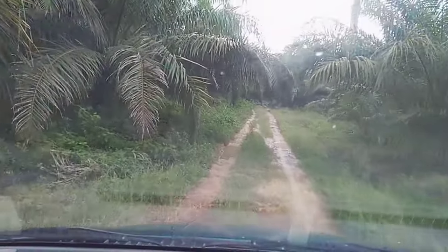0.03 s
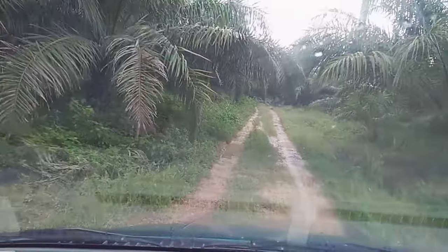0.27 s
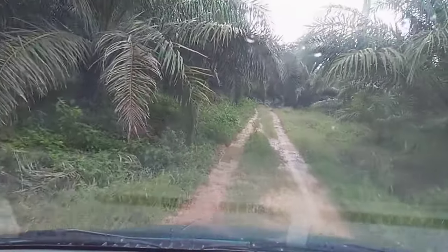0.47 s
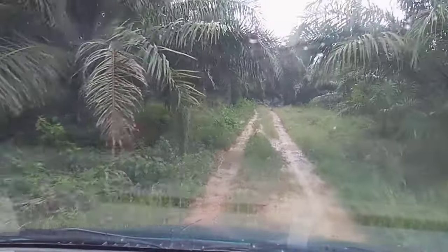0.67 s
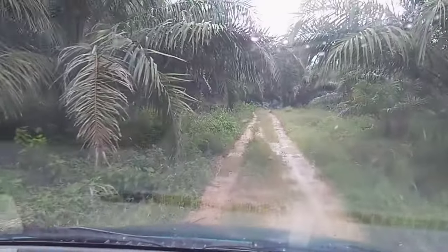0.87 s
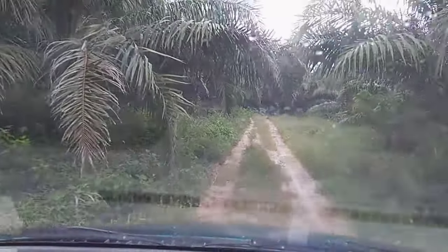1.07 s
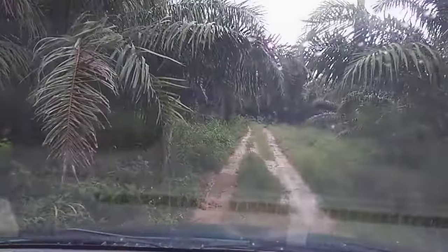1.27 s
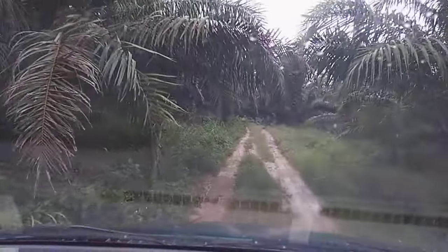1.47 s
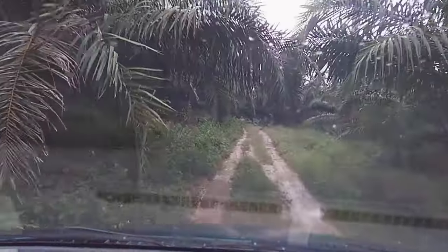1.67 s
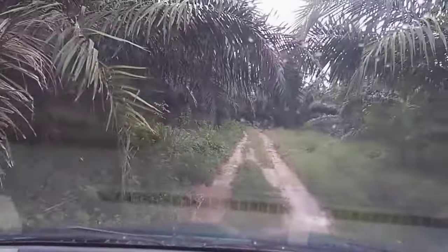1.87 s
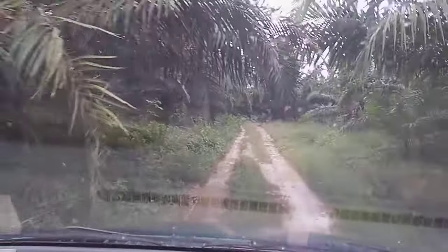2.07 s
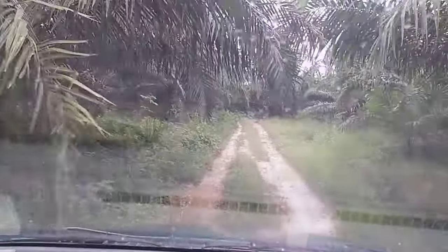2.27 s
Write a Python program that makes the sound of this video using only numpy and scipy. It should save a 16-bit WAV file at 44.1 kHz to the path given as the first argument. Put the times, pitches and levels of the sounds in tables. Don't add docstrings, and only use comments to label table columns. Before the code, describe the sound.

Deep rumble and heavy thumps inside a slow car on a bumpy track, with knocks and key ticks

```python
import sys
import numpy as np
from scipy import signal
from scipy.io import wavfile

SR = 44100
rng = np.random.default_rng(int(sys.argv[2]) if len(sys.argv) > 2 else 0)


def bounce(signal):
    frames = np.transpose(np.atleast_2d(signal))
    limited = np.clip(frames, -1, 1)
    pcm = np.round(limited * 32767).astype(np.int16)
    wavfile.write(sys.argv[1], SR, pcm)


def to_linear_factor(level_db):
    exponent = np.asarray(level_db, float) / 20
    return 10 ** exponent


N = 102267

SHELL_DB = -50
PORT_HZ, PORT_WIDTH_HZ = 10580, 4300


def rms_one(x):
    return x / np.sqrt(np.mean(x ** 2) + 1e-20)


def pan(x, db):
    left = to_linear_factor(db)
    sides = np.array([left / (1 + left) + 0 * x, 1 / (1 + left) + 0 * x])
    return 2 * x * sides


def drift(rate):
    r = np.exp(-80 * np.pi * rate / SR)
    white = rng.standard_normal(N // 40 + 2002)
    slow = signal.lfilter([1], [1, -2 * r, r * r], white)[2000:]
    return np.interp(np.arange(N) / 40, np.arange(len(slow)), rms_one(slow))


def resonate(x, hz, width_hz):
    r = np.exp(-np.pi * width_hz / SR)
    gain = (1 - r * r) / 2
    return signal.lfilter([gain, 0, -gain], [1, -2 * r * np.cos(2 * np.pi * hz / SR), r * r], x)


def resonate_twice(x, hz, width_hz):
    return resonate(resonate(x, hz, width_hz), hz, 2 * width_hz)


def band(x, low_hz, high_hz):
    sos = signal.butter(2, [low_hz, min(high_hz, SR * .45)], "band", fs=SR, output="sos")
    return signal.sosfilt(sos, x)


def coloured(spectrum, alike, patchy_db):
    hz, db = np.transpose(spectrum)
    edges = np.geomspace(hz[0], hz[-1], num=14)
    white, out = rng.standard_normal((2, 2, N)), 0
    for k, (low, high) in enumerate(zip(edges, edges[1:])):
        mid, side = band(white[k % 2], low, high)
        level_db = np.interp(np.log(low * high) / 2, np.log(hz), db)
        gain = to_linear_factor(level_db + patchy_db * drift(20.0))
        out = out + gain * (np.sqrt(1 + alike) * mid + np.sqrt(1 - alike) * side * [[1], [-1]])
    return rms_one(out)


# centre in Hz, width in Hz, level in dB.
RIDGES = [(5610, 620, -95), (7130, 840, -91)]


def ridges():
    white, out = rng.standard_normal((2, N)), 0
    for hz, width, db in RIDGES:
        ridge = rms_one(resonate(resonate(white, hz, width), hz, width))
        out = out + to_linear_factor(db + 4.0 * drift(12.0)) * ridge
    return out


# pitch in Hz, level in dB per Hz.
HISS_COLOUR = [(2940, -6), (5000, -14.5), (6400, -8), (8210, -12.5), (9640, -2.5), (10700, 10),
               (12500, -25.5), (13300, -27), (15400, -28)]


def hiss():
    steady = to_linear_factor(-79) * coloured(HISS_COLOUR, 0, patchy_db=1.9)
    return (steady + ridges()) * to_linear_factor([[1.5], [-1.5]])


# pitch in Hz, level in dB per Hz.
ROAD_COLOUR = [(150, -34), (250, -4), (383, -7.5), (451, -14), (594, -13), (753, -15), (1200, -19),
               (5000, -44.5), (6500, -84.5), (11000, -120)]


def road(shaking):
    follow = (shaking / to_linear_factor(SHELL_DB)) ** 0.35
    noise = coloured(ROAD_COLOUR, 0.19, patchy_db=2.2)
    return to_linear_factor(-69.5) * follow * noise * to_linear_factor([[3], [-3]])


# start in seconds, length in seconds, level in dB, top in Hz, bright share in dB.
SCUFFS = [(-0.005, 0.0061, -62, 3300, 5), (.04, 0.015, -73, 3340, -2), (0.168, 0.041, -75, 3850, -3),
          (0.214, 0.039, -71.5, 2870, -24), (0.311, 0.035, -69.5, 3500, -26),
          (0.542, 0.05, -74, 2800, -2.5), (0.577, 0.086, -64.5, 1860, -17),
          (0.614, 0.046, -73.5, 6460, -19), (0.784, 0.024, -66.5, 3320, -13),
          (0.66, 0.09, -69.5, 2070, -5.5), (1.041, 0.018, -66.5, 4200, -7),
          (1.076, 0.0084, -69, 2600, -6.5), (1.123, 0.099, -78, 4630, -1.5), (1.255, 0.015, -75.5, 2790, 0),
          (1.388, 0.015, -78.5, 4000, -7), (1.742, 0.053, -72, 1600, -19), (1.337, 0.028, -72.5, 2740, -15),
          (1.508, 0.021, -85, 4060, -15), (1.823, 0.017, -70.5, 1850, -32), (1.853, 0.074, -62, 1390, -20),
          (1.9, 0.015, -61, 4330, -12.5), (1.935, 0.078, -70, 4050, -3.5), (2.03, 0.014, -60.5, 2960, -9),
          (2.056, 0.06, -76, 3400, -14), (2.207, 0.066, -78.5, 2470, -1.5)]


def scuffs(t):
    attack_share, release_s, grains_per_s = .4, 0.016, 4500
    hits = rng.random((2, N)) < grains_per_s / SR
    strength = rng.standard_normal((2, N)) * to_linear_factor(2 * np.minimum(rng.exponential(1, (2, N)), 2))
    grains = hits * strength
    bright = rms_one(resonate_twice(grains, PORT_HZ, PORT_WIDTH_HZ))
    thud = to_linear_factor(2.5) * rms_one(band(grains.sum(axis=0), 140, 422))
    crisp = sum(resonate(resonate(grains, hz, 2 * width), hz, 2 * width) for hz, width, db in RIDGES)
    bright = bright + to_linear_factor(-9.5) * rms_one(crisp)
    out = np.zeros((2, N))
    for s, length, db, top_hz, bright_db in SCUFFS:
        attack = np.clip((t - s) / (attack_share * length), 0, 1) ** 2
        release = np.exp(-np.maximum(t - s - length, 0) / release_s)
        dull = band(band(grains, .38 * top_hz, top_hz), 200, 0.98 * top_hz)
        out += to_linear_factor(db) * attack * release * (rms_one(dull) + thud + to_linear_factor(bright_db) * bright)
    return out * to_linear_factor([[2.75], [-2.75]])


KEY_HZ = [11700, 10330, 10730, 10530]
# start in seconds, peak in dB, time to fade by 60 dB in seconds, left over right in dB.
TICKS = [
    (-0.002, -40, 0.23, 17),
    (0.8017, -35, 0.067, 43),
    (0.83, -52.5, 0.1, 18),
    (.428, -59.5, .04, 3),
    (1.231, -58, 0.042, 11),
    (1.396, -57, 0.038, 8.5),
    (1.541, -54.5, 0.03, 12),
]


def ticks(t):
    rise_s, snap_db, snap_s = .0012, 7, .0025
    white = rng.standard_normal(N)
    broad = resonate(resonate(white, PORT_HZ, 3000), PORT_HZ, 5000)
    jingle = rms_one(broad + sum(3.4 * resonate(white, hz, 170) for hz in KEY_HZ))
    out = 0
    for s, db, t60, pan_db in TICKS:
        age = np.maximum(t - s, 0)
        fade_db = -60 * age / t60 + snap_db * np.exp(-age / snap_s)
        shape = np.clip(age / rise_s, 0, 1) * to_linear_factor(db - 16.5 + fade_db)
        out = out + pan(shape * jingle, pan_db)
    return out


def contact(t, peak_s):
    u = np.maximum(t, 0) / peak_s
    return (u * np.exp(1 - u)) ** 2.5


def struck(t, hz, peak_s):
    return np.sin(2 * np.pi * hz * t) * contact(t, peak_s)


# pitch in Hz, level in dB, time to peak in seconds.
CLACK = [(640, 4.5, 0.0054), (1200, 7.5, 0.0021), (1670, -0.5, 0.0051), (1894, -5.5, 0.0058),
         (2214, -13.5, 0.006), (3200, -11, 0.0042), (3650, -10, 0.0044), (4400, -24, 0.0027),
         (5300, -39, 0.0022)]


def clack(t):
    start_s, level_db = 1.0472, -40.5
    modes = sum(to_linear_factor(level_db - 5.5 + db) * struck(t - start_s, hz, peak_s) for hz, db, peak_s in CLACK)
    return pan(modes, 8.5)


# start in seconds, peak in dB, pitch in Hz, time to peak in seconds, left over right in dB.
KNOCKS = [(0.054, -60.5, 1430, 0.00087, -22), (0.249, -57.5, 950, 0.0018, 10),
          (.313, -51, 932, 0.0083, 13.5), (.3285, -51, 930, 0.001, 15), (0.3329, -51, 938, 0.0024, 11),
          (0.3383, -48, 950, 0.0033, 17.5), (0.352, -45.5, 913, 0.0031, 13.5),
          (0.428, -64, 3460, 0.00059, 16), (0.7886, -43, 1400, 0.0028, 21), (0.603, -50.5, 1110, .003, 0.1),
          (0.6133, -54, 1540, 0.0066, 5), (.624, -51, 1143, 0.0031, 2), (0.6407, -54.5, 1704, 0.0034, 14),
          (0.795, -50, 1450, 0.0017, -4), (.8008, -61.5, 6930, .0015, 22),
          (0.802, -51.5, 1430, 0.0011, -14), (0.812, -55, 1530, 0.0021, 7), (1.192, -58, 1130, 0.0048, 7.5),
          (1.198, -69, 1562, 0.011, 17), (1.496, -67, 900, 0.00087, 4), (1.51, -61, 950, 0.0017, 13),
          (1.525, -53, 1435, 0.0027, 11.5), (1.531, -61.5, 1610, .002, 11), (1.54, -62, 1690, 0.0013, 4),
          (1.757, -61.5, 1160, 0.0026, 21), (1.9628, -63, 1120, .004, 12), (1.544, -62, 1545, 0.005, 7),
          (1.757, -58.5, 640, 0.0076, 6), (1.886, -56.5, 1166, 0.0056, 18),
          (1.899, -55.5, 2800, 0.0013, 10), (2.0872, -44.5, 1073, 0.0013, -32),
          (2.103, -55, 1066, 0.0019, -8), (2.273, -56, 1235, 0.0024, 10)]
# start in seconds, peak in dB, pitch in Hz, time to peak in seconds.
CREAKS = [(0.317, -65, 2720, .005), (.331, -64.5, 2296, 0.0028), (0.352, -63, 2725, 0.0062),
          (0.7995, -63.5, 3100, 0.0025), (1.171, -66, 3640, .0011), (1.1715, -69, 5400, 0.00092),
          (1.203, -70.5, 1910, 0.012), (1.231, -70, 3300, .001), (1.526, -76, 2970, 0.0027),
          (1.5406, -65, 3310, 0.0011), (1.963, -68, 3190, .005)]


def knocks(t):
    buzz = 0.059
    creak_pan_db = 13.5
    grit = rms_one(resonate_twice(rng.standard_normal(N), 2780, 450))
    out = np.zeros((2, N))
    for s, db, hz, peak_s, pan_db in [*KNOCKS, *[(*row, creak_pan_db) for row in CREAKS]]:
        i = slice(int(s * SR), int(s * SR) + SR // 8)
        age = t[i] - s
        upper = to_linear_factor(-27) * grit[i] * contact(age, peak_s)
        knock = struck(age, hz, peak_s) * (1 + buzz * grit[i])
        out[:, i] += pan(to_linear_factor(db) * (knock + upper), pan_db)
    return out


def cabin(x):
    t60_s, level_db = .08, -14
    t = np.arange(SR // 6) / SR
    tail = rng.standard_normal((2, len(t))) * to_linear_factor(-60 * t / t60_s) * (t > .002)
    tail = signal.lfilter([.5], [1, -.5], tail)
    tail = tail / np.sqrt(np.sum(tail ** 2, axis=1, keepdims=True))
    return to_linear_factor(level_db) * signal.fftconvolve(x, tail, axes=1)[:, :N]


# time in seconds, shell level in dB, deep hum level in dB.
TRACK = [(0, 0.5, -1), (.12, -5, 2), (.3, 0.2, 2), (.48, -9.5, -3), (.68, 5.5, -2), (.95, -4, -1.5),
         (1.16, 0.5, 1), (1.3, 1, -9), (1.55, 1.7, 3), (1.75, -0.5, -3), (1.95, 3, -4.5), (2.32, -5.5, 1.5)]


def track():
    s, *columns = np.transpose(TRACK)
    return [np.interp(np.arange(N) / SR, s, c) for c in columns]


def shake():
    lead_s, wider = 0.015, 1.27
    t, shudder = np.arange(N) / SR, 0
    for s, db, hz, width in [*HEAVES, *PUSHES]:
        bump = np.exp(-((t - s + lead_s) / (wider * width)) ** 2)
        shudder = shudder + (to_linear_factor(db * 0.87 - 19) * bump) ** 2
    return np.sqrt(to_linear_factor(2 * (SHELL_DB + track()[0])) + shudder)


# pitch in Hz, width in Hz, level in dB.
SHELL = [(27, 14.7, 3.5), (59.5, 14.9, -9.5), (82.6, 29.6, -27), (121.5, 20.5, -15), (179.5, 20.8, -26.5),
         (226.3, 18, -30), (259, 43, -34), (377, 60, -33.5), (598, 86, -45)]


def shell(shaking, lean_db):
    warm_up = SR // 2
    white = rng.standard_normal((2, 2, N + warm_up))
    drive = white[0] * np.concatenate([np.full(warm_up, shaking[0]), shaking])

    def mode(x, hz, width, db):
        ringing = resonate_twice(x, hz, width)[:, warm_up:]
        return ringing * np.sqrt(SR / 2 / width) * to_linear_factor(db + 2 * drift(3.32))

    hum = to_linear_factor(-43.5 + track()[1]) * mode(white[1], *SHELL[0])
    upper = sum(mode(drive, *row) * (-1) ** k for k, row in enumerate(SHELL[1:]))
    both = hum + to_linear_factor(7) * upper
    return pan(both[0], lean_db) + to_linear_factor(-16.0) * both[1] * [[1], [-1]]


# time in seconds, left over right in dB.
LEAN = [(0, 0), (0.359, 7.5), (1.1, 7.5), (2.32, 11)]


def lean(t):
    s, lean_db = np.transpose(LEAN)
    return np.interp(t, s, lean_db)


def swell(t, rows):
    out = 0
    for s, db, hz, width in rows:
        out = out + to_linear_factor(db) * np.exp(-((t - s) / width) ** 2) * np.cos(2 * np.pi * hz * (t - s))
    return out


# centre in seconds, peak in dB, pitch in Hz, width in seconds.
HEAVES = [(0.069, -28.5, 27.2, 0.011), (0.15, -29, 27, 0.019), (0.292, -21, 28.3, 0.019),
          (0.391, -15, 27, 0.037), (0.495, -33.5, 27, 0.034), (.02, -34.5, 27, 0.014),
          (0.577, -41, 27, 0.043), (0.926, -41, 27, 0.016), (1.047, -60, 27, .025), (1.2, -34.5, 27, 0.018),
          (1.371, -37, 59.8, 0.026), (0.716, -29, 30.6, 0.042), (0.741, -34.5, 59.8, 0.097),
          (0.982, -37.5, 27, 0.012), (1.119, -33.5, 38, 0.014), (1.433, -18.5, 27, 0.034),
          (1.464, -26.5, 52.3, 0.04), (1.505, -24, 27.9, 0.029), (1.551, -36, 30, 0.019),
          (1.589, -31.5, 50.4, 0.049), (2.003, -21, 28.2, 0.013), (2.18, -28, 26, 0.018),
          (2.234, -28, 38.2, 0.011), (2.276, -29, 23.8, 0.057)]
# centre in seconds, peak in dB, pitch in Hz, width in seconds.
PUSHES = [
    (0.7952, -26, 86, 0.0041),
    (1.984, -19, 35.4, 0.0055),
    (2.046, -24.5, 30.8, 0.017),
    (2.205, -25.5, 40, 0.0093),
    (2.250, -22.5, 26, 0.0052),
]
# centre in seconds, peak in dB, pitch in Hz, width in seconds.
BOOMS = [(.03, -49, 124.3, 0.037), (0.379, -39, 118.5, 0.032), (0.413, -36, 114.4, 0.019),
         (2.238, -47, 168, 0.03), (0.666, -45.5, 135, 0.01), (0.691, -46, 185, 0.018),
         (1.158, -49, 132, .02), (1.51, -42.5, 101, 0.016), (1.945, -44, 156, 0.019),
         (1.995, -43, 192, 0.017), (2.05, -49, 110, 0.02), (2.164, -52.5, 140, .015)]


def heaves(t):
    return swell(t, PUSHES) - swell(t, HEAVES) + swell(t, BOOMS)


def scene():
    t = np.arange(N) / SR
    lean_db, shaking = lean(t), shake()
    trim = clack(t) + knocks(t)
    trim[1] = np.interp(t - 0.00039, t, trim[1])
    background = hiss() + road(shaking)
    details = scuffs(t) + ticks(t) + trim + cabin(trim)
    rumble = shell(shaking, lean_db) + pan(heaves(t), lean_db)
    closing = np.clip((t[-1] - t) / .015, .3, 1)
    return background + details + closing * rumble


def top_cut(x):
    return signal.sosfilt(signal.butter(12, 15600, fs=SR, output="sos"), x)


def record(dry):
    top = .33
    mix = top * np.tanh(dry / top)
    return top_cut(mix)


dry = scene()
out = record(dry)
bounce(out)
```